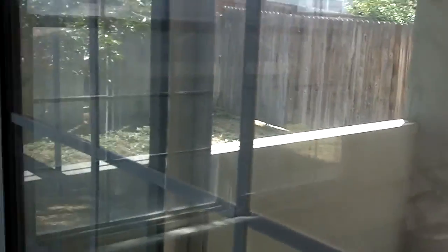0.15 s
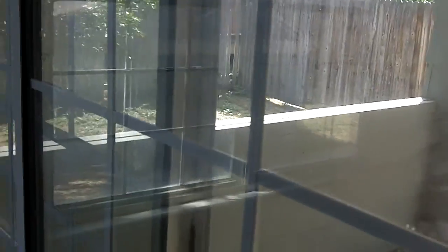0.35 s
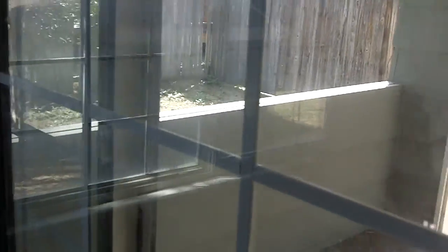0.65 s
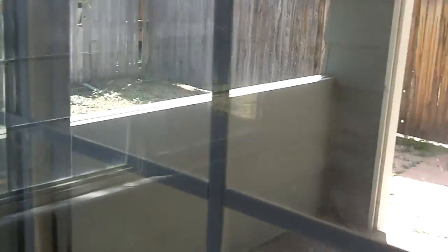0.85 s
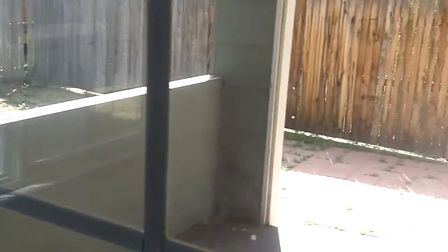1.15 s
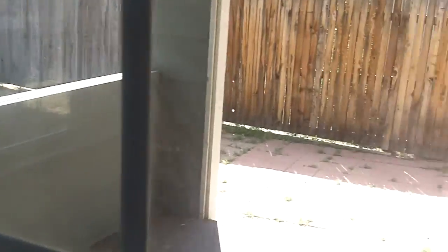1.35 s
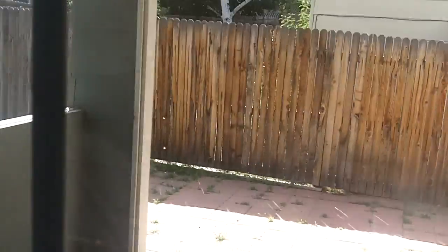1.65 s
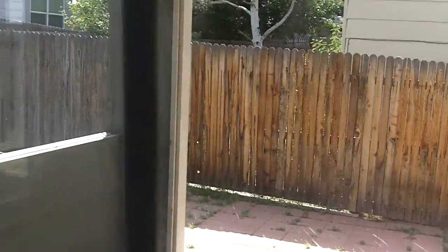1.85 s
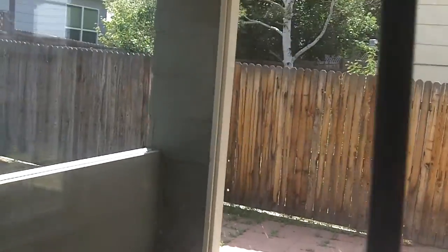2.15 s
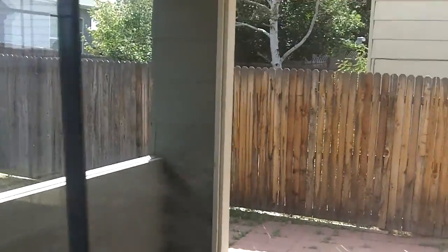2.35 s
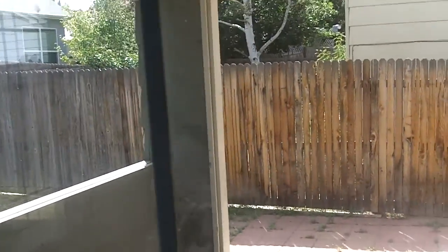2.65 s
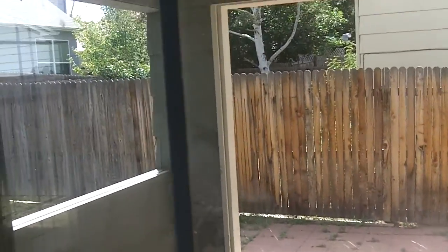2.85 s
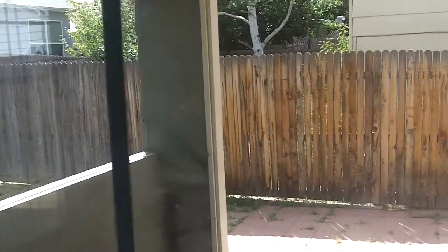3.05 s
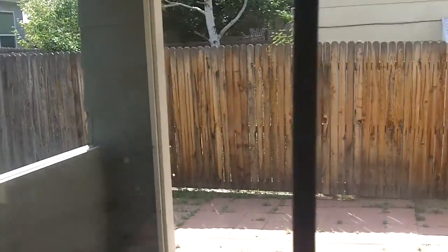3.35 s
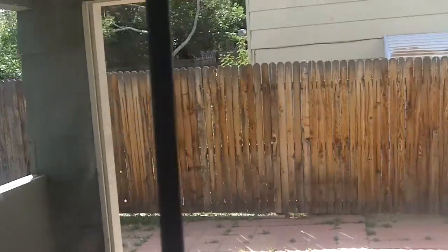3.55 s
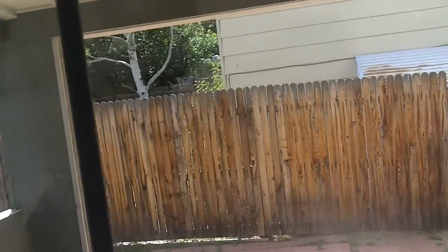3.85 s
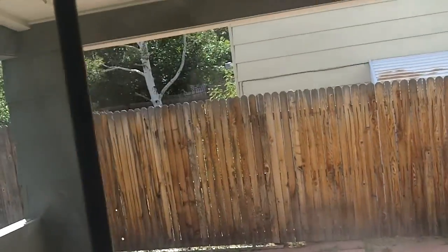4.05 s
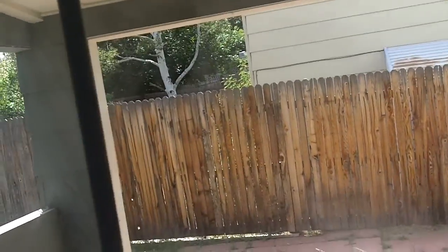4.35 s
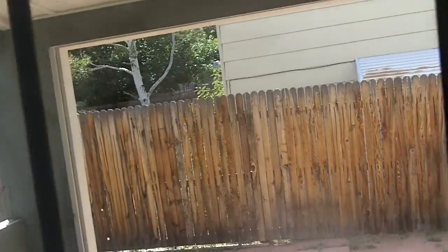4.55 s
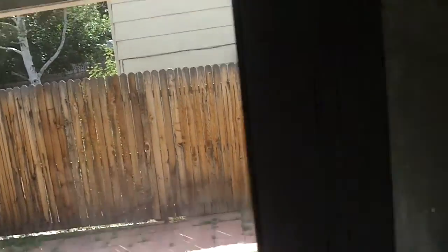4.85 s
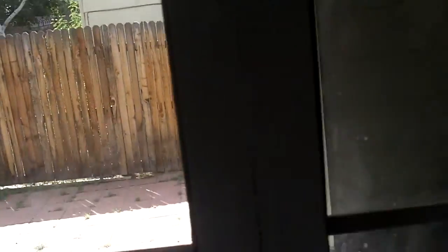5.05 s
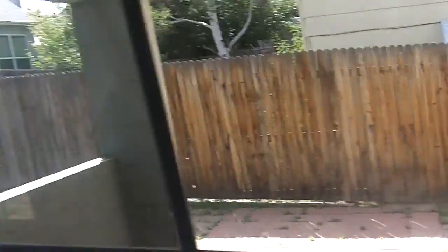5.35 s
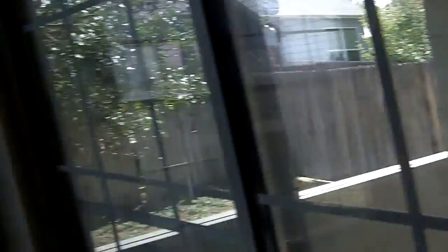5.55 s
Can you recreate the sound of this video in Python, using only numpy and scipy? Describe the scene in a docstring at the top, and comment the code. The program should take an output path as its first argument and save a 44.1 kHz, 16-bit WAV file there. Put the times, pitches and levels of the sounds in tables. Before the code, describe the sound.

Rolling rumble of a heavy glass door swells for a second, ends in a sharp double bang and shudder, followed later by a bright latch click.

```python
"""Glass patio door rolled open

A glass patio door is rolled open in an empty room: uneven bumps make its rollers rumble and its brush seal hiss.
It hits the end stop in a burst of short noisy blows with ringing, bounces and shudders; the big pane wobbles.
Later the latch snaps as a filtered click with a pinging spring. Soft knocks, ticks, scuffs and rattles
come before and after, over shaped noise for the quiet air from the yard. An echo adds the room."""
import sys
import numpy as np
from scipy import signal
from scipy.fft import rfft, irfft, next_fast_len
from scipy.io import wavfile
from scipy.ndimage import uniform_filter1d

SR = 44100
rng = np.random.default_rng(int(sys.argv[2]) if len(sys.argv) > 2 else 0)


def file_out(sig):
    """Save sig as 16-bit WAV at sys.argv[1]."""
    # one column per channel
    cols = np.atleast_2d(sig).T
    # limit, then scale
    lim = np.clip(cols, -1, 1)
    pcm = np.round(lim * 32767).astype(np.int16)
    wavfile.write(sys.argv[1], SR, pcm)


N = 250929
T = np.arange(N) / SR   # time in seconds

# In all tables, t60 is the time to fade by 60 dB, and a level "over 5 ms" spreads a hit's energy over 5 ms.
# Tone of the quiet air from the yard. Each row: frequency in Hz, relative level in dB.
YARD_TONE = [(70, -8.5), (118, -1), (150, -11), (200, -10.5), (270, -18), (600, -22.5), (1200, -22.5),
             (1450, -28), (3200, -33), (6000, -38), (12000, -42), (15000, -53)]
YARD_DB = -58.5
# How long the room echoes. Each row: frequency in Hz, t60 in seconds.
ROOM_FADE = [(100, 1), (400, .7), (1500, 0.49), (4000, .52), (8000, .37), (14000, 0.28)]
# Soft scuffs of hand and feet. Each row: peak time in seconds, half length in seconds, level in dB.
SCUFFS = [(0.073, 0.24, -58.5), (0.392, 0.064, -56.5), (2.64, 0.16, -63), (4.608, 0.047, -64.5),
          (5.01, 0.11, -61.5)]
# Tone of a scuff. Each row: frequency in Hz, relative level in dB.
SCUFF_TONE = [(170, -6), (370, 5), (700, -3), (1000, 1), (1600, -13), (4000, -16.5), (8000, -25.5),
              (13000, -34.5)]
# Soft knocks of hand and feet. Each row: start in seconds, level in dB over 5 ms, dull above Hz, t60 in seconds.
KNOCKS = [(.097, -43, 900, 0.052), (2.583, -35.5, 1900, 0.035), (2.615, -44.5, 330, .12),
          (3.8996, -45, 240, 0.06), (4.539, -49, 420, 0.032), (4.5788, -45.5, 520, 0.029),
          (5.025, -54, 480, .08), (5.308, -57, 1500, .1)]
# Tone of a soft knock. Each row: frequency in Hz, relative level in dB.
KNOCK_TONE = [(50, -7.5), (130, 2), (400, 2), (700, -5.5), (1800, -6), (14000, -24.5)]
# Small bright ticks: grit under the rollers, the door settling, the camera being handled.
# Each row: start in seconds, level in dB over 5 ms, pitch in Hz, filter width as a share of the pitch,
# t60 in seconds.
TICKS = [(0.0728, -54, 1950, 1.1, .08), (0.0952, -46.5, 1290, 0.86, 0.055), (1.333, -51, 6000, .9, .012),
         (1.373, -50, 7940, 0.46, .012), (1.752, -55.5, 7000, 0.54, .025), (1.911, -61, 7000, 0.6, .015),
         (1.963, -62, 7740, .3, .015), (2.572, -50, 3300, .8, 0.01), (2.5855, -43, 2400, 1.17, .02),
         (2.992, -56.5, 2100, .6, 0.02), (3.009, -58, 3300, .7, .05), (3.5772, -55.5, 2300, .8, 0.025),
         (4.0777, -38.5, 3700, 0.73, 0.012), (4.5205, -56.5, 8000, .35, 0.022),
         (4.5212, -58, 2980, 0.53, 0.019), (4.578, -51, 3120, .2, 0.0095), (4.579, -52, 850, 0.26, .02),
         (4.7278, -57, 4700, 0.78, .0051), (5.145, -55, 8500, 1, 0.14)]
# Loose fittings rattle. Each row: peak time in seconds, half length in seconds, level in dB.
RATTLES = [(3.04, .06, -73), (3.59, .11, -72.5)]
RATTLE_HZ, RATTLE_WIDTH_HZ = 2600, 1900
# The latch snap (level over 5 ms) and its spring (peak level).
LATCH_S, LATCH_DB, SPRING_HZ, SPRING_DB = 4.0663, -33.5, 7060, -5
# Tone of the latch housing. Each row: frequency in Hz, relative level in dB.
LATCH_TONE = [(90, 3.5), (240, 3), (480, -9), (720, 2.5), (1200, -1), (2100, 3.5), (3200, 2), (4000, 5.5),
              (6000, -1), (8000, -2.5), (10000, -15), (13000, -21)]
# The wobble of the big pane.
PANE_HZ, PANE_T60_S, PANE_DB = 12, 3.4, -17.5
# Stirred air: level at rest, level added by steady top speed, and how slowly it follows the door.
STILL_AIR_DB, MOVING_AIR_DB, AIR_LAG_S = -51, -29, 0.39
# Short scrapes as the door rocks. Each row: peak time in seconds, level in dB.
SCRAPES = [(1.003, -47.5), (1.122, -48.5), (1.843, -52), (2.011, -56), (2.135, -58.5), (2.244, -64)]
# The frame chafes in its channel; the level is for top speed.
CHAFE_HZ, CHAFE_WIDTH_HZ, CHAFE_DB = 4200, 1400, -57
# The shudder builds up after the rebound and dies away.
SHUDDER_S, SHUDDER_RISE_S, SHUDDER_DB, SHUDDER_FALL_DB_PER_S = 1.674, .12, -45, 24
# Tone of the loose door rattling. Each row: frequency in Hz, relative level in dB.
SHUDDER_TONE = [(60, -0.5), (220, 4), (400, 1), (600, -5.5), (1600, -14.5), (3000, -21), (4200, -18.5),
                (6500, -36.5), (12000, -52)]
# Blows of the frame on the end stop. Each row: start in seconds, level in dB over 5 ms, dull above Hz,
# crunch t60 in seconds, then the ring of the struck part: level in dB, pitch in Hz, t60 in seconds.
BLOWS = [(1.5762, -31, 3500, 0.015, -9.5, 240, .023), (1.579, -18, 14000, 0.0071, -20, 280, .025),
         (1.5802, -12, 9500, 0.011, -26, 2620, .055), (1.6112, -25, 1500, 0.035, -19.5, 710, .025),
         (1.6200, -14, 2300, 0.015, -14, 1080, .03), (1.6274, -28, 2500, 0.03, -25, 3400, .02)]
# Tone of the blows. Each row: frequency in Hz, relative level in dB.
BLOW_TONE = [(100, -9.5), (300, 3), (520, -7), (700, -4), (1200, 2.5), (1600, -6.5), (2100, -1.5),
             (2900, -5.5), (4500, -2.5), (6500, -11), (9000, -11), (15000, -28)]
# Pitches at which the struck door rings. Each row: pitch in Hz, relative level in dB, t60 in seconds.
DOOR_MODES = [(114.7, -32, .5), (168.6, -39, 0.74), (228, -40, .7), (600, -39, .3), (857, -42, 0.35),
              (1066, -45, 0.25), (1190, -42, .2)]
# A flat spot on a roller jolts it once each turn. Each row: start in seconds, thud level in dB over 5 ms, click
# level in dB over 5 ms, click pitch in Hz.
JOLTS = [(.587, -33, -43, 800), (.683, -30.5, -45, 700), (.785, -27, -40, 900), (.803, -30, -43, 1000),
         (.903, -25, -41, 1700), (1.051, -28, -42, 1400), (1.116, -26, -42, 2500),
         (1.408, -31.5, -43, 1700), (1.548, -34, -43, 2300)]
# The door's speed, easing before the stop. Each row: time in seconds, share of top speed.
SPEED_CURVE = [(.32, 0.017), (.34, 0.046), (.42, .08), (.47, 0.33), (.62, 0.48), (.8, 0.91), (1.08, 1),
               (1.22, 0.83), (1.33, 0.68), (1.56, 0.72), (1.6, 0)]
# The rollers drive the hollow frame. Each row: pitch in Hz, width in Hz, relative level in dB.
FRAME_MODES = [(182, 45, -1), (235, 55, 0), (285, 45, -2)]
# Tone of the wheels on the track. Each row: frequency in Hz, relative level in dB.
RUMBLE_TONE = [(50, -12), (100, -3), (170, -0.5), (300, 1.5), (380, -7.5), (520, -9.5), (700, -18.5),
               (2000, -54.5)]
# Tone of the grit under the wheels. Each row: frequency in Hz, relative level in dB.
GRIT_TONE = [(250, -10.5), (600, -2), (830, 7.5), (1150, 1), (2100, -9.5), (3200, -17.5), (9000, -42)]
# Tone of the brush seal rubbing along the frame. Each row: frequency in Hz, relative level in dB.
SEAL_TONE = [(1000, -14), (2100, -4.5), (3100, -2.5), (4400, 2), (6300, -5), (9000, -5.5), (11000, -17.5),
             (14000, -27)]
# Each rolling sound: its base level at top speed, and the power of the speed that it grows with.
RUMBLE_DB, RUMBLE_POWER = -28.5, 1.214
GRIT_DB, GRIT_POWER = -42.5, 1.6
SEAL_DB, SEAL_POWER = -55, 0.42
# The frame booms more as it comes up to the microphone.
FRAME_FAR_DB, FRAME_FAR_S, FRAME_NEAR_S = -9, .7, 1.05
# The wheels drone at a pitch that rises with speed, spread by noise to either side.
DRONE_REST_HZ, DRONE_RISE_HZ, DRONE_SPREAD_HZ, DRONE_DB = 140, 78, 16, -3.5
# The seal breaks free before the wheels get going.
SEAL_START_S, SEAL_RISE_S = .32, .085
CUTOFF_HZ = 15300   # top of the finished sound


def amp(db):
    """Turn decibels into a multiplier."""
    return 10 ** (np.asarray(db) / 20)


def rms_one(x):
    """Scale to an average (rms) strength of 1."""
    return x / np.sqrt(np.mean(x ** 2) + 1e-20)


def hit_one(x):
    """Scale a short sound so that its energy, spread over 5 ms, has an rms of 1."""
    return x * np.sqrt(.005 * SR / np.sum(x ** 2))


def at_hz(points, hz):
    """Read a table between its rows, on a log-frequency axis."""
    f, value = np.transpose(points)
    return np.interp(np.log(np.maximum(hz, 1)), np.log(f), value)


def colour(x, spectrum):
    """Give a sound the tone in a table, falling away beyond both ends, with a causal (minimum-phase) filter."""
    size = next_fast_len(len(x) + SR // 4, real=True) * 2
    hz = np.maximum(np.arange(size // 2 + 1) * SR / size, 1)
    skirts = np.clip(np.minimum(hz / spectrum[0][0], spectrum[-1][0] / hz), .05, 1) ** 2
    cepstrum = irfft(np.log(amp(at_hz(spectrum, hz)) * skirts))[:size // 2]
    cepstrum[1:] *= 2   # folding the cepstrum keeps the filter from sounding early
    response = np.exp(rfft(cepstrum, size))
    return irfft(rfft(x, size) * response)[:len(x)]


def cut(x, hz, kind="low", order=1):
    """Remove frequencies with a Butterworth filter."""
    sos = signal.butter(order, np.clip(hz, 10, .45 * SR), kind, fs=SR, output="sos")
    return signal.sosfilt(sos, x)


def resonate(x, hz, width_hz):
    """Let a sound excite one two-pole resonance, with a gain of 1 on top."""
    r = np.exp(-np.pi * width_hz / SR)
    feedback = [1, -2 * r * np.cos(2 * np.pi * hz / SR), r * r]
    return signal.lfilter(np.array([1, 0, -1]) * (1 - r * r) / 2, feedback, x)


def resonate_twice(x, hz, width_hz):
    """Pass a sound through the same resonance twice, for steeper sides."""
    return resonate(resonate(x, hz, width_hz), hz, width_hz)


def dying(t60, size=SR // 2):
    """Fade exponentially from 1."""
    return np.exp(-np.log(1000) * np.minimum(T[:size] / t60, 5))


def ring(hz, t60, size=SR // 2):
    """A struck part rings as a sine wave that dies away."""
    return np.sin(2 * np.pi * hz * T[:size]) * dying(t60, size)


def even(x):
    """Level out the broad peaks and dips of a random burst, keeping its fine grain; energy 1."""
    spectrum = rfft(x, 2 * len(x))
    power = uniform_filter1d(np.abs(spectrum) ** 2, size=300)
    flat = irfft(spectrum / np.sqrt(power))[:len(x)]
    return flat / np.linalg.norm(flat)


def crunch(t60, sharp):
    """One contact: a first click, as strong as sharp says, and a dying spray of tiny ones."""
    spray = rng.standard_normal(SR // 2) * dying(t60)
    spray[0] = sharp * np.linalg.norm(spray)
    return even(spray)


def add(track, s, sound):
    """Mix a sound in at time s."""
    i = round(s * SR)
    track[i:i + len(sound)] += sound[:N - i]


def bumps(per_s, spread_db):
    """Random impacts of uneven size and either sign."""
    sizes = amp(spread_db * np.minimum(rng.exponential(1, N), 4)) * rng.choice([-1, 1], N)
    return rms_one(sizes * (rng.random(N) < per_s / SR))


def flutter(rate_hz, depth_db):
    """A gain that wavers at random, up to twice the depth either way."""
    wander = rms_one(cut(rng.standard_normal(N), rate_hz, order=2))
    return amp(abs(depth_db) * np.clip(wander, -2, 2))


def swell(s, half_s):
    """A smooth bell-shaped rise and fall around time s."""
    return np.exp(-((T - s) / half_s) ** 2)


def speed():
    """The door's speed as a share of its top speed; the end values hold outside the table."""
    return np.maximum(np.interp(T, *np.transpose(SPEED_CURVE)), 1e-9)


def tick(hz, width_share, t60, top_hz=11000):
    """A bright, heavily damped contact: a crunch through a broad resonance."""
    width_hz = hz * np.clip(width_share, .05, 1.2)
    bright = resonate_twice(crunch(t60, sharp=.3), hz, width_hz)
    return hit_one(cut(bright, top_hz, order=3))


def knock(dull_hz, t60):
    """A soft, dull contact: a crunch with its treble removed."""
    return hit_one(cut(colour(crunch(t60, sharp=.3), KNOCK_TONE), dull_hz, order=2))


def yard_air():
    """The quiet air from the yard is steady noise with a tone of its own."""
    return amp(YARD_DB) * rms_one(colour(rng.standard_normal(N), YARD_TONE))


def room(x, early_db=-2, early_t60=0.073, gap_s=0.0043, wall_hz=9500):
    """Close reflections off glass and wall, then a tail that fades at its own pace in each band."""
    edges = np.geomspace(50, 16000, 13)
    tail = 0
    for lo, hi in zip(edges, edges[1:]):
        band = cut(rng.standard_normal(SR), [lo, hi], "band", order=2)
        tail = tail + band * dying(at_hz(ROOM_FADE, np.sqrt(lo * hi)), size=SR)
    early = even(rng.standard_normal(SR) * dying(early_t60, size=SR))
    response = tail / np.linalg.norm(tail) + amp(early_db) * early
    response = response * (T[:SR] > gap_s)   # no echo returns before the gap is over
    return signal.fftconvolve(x, cut(response, wall_hz))[:N]


def small_sounds():
    """Hand and feet make dull knocks and grainy scuffs of many tiny bumps."""
    rubbing = rms_one(colour(bumps(per_s=4000, spread_db=6.0), SCUFF_TONE))
    out = rubbing * sum(amp(db) * swell(s, half_s) for s, half_s, db in SCUFFS)
    for s, db, dull_hz, t60 in KNOCKS:
        add(out, s, amp(db) * knock(dull_hz, t60))
    return out


def small_ticks():
    """Small bright ticks with little echo, each a damped crunch at its own pitch."""
    out = np.zeros(N)
    for s, db, hz, width_share, t60 in TICKS:
        add(out, s, amp(db) * tick(hz, width_share, t60))
    return out


def rattles():
    """Loose fittings give scattered tiny clicks."""
    clicks = resonate_twice(bumps(per_s=80, spread_db=2.5), RATTLE_HZ, RATTLE_WIDTH_HZ)
    return rms_one(clicks) * sum(amp(db) * swell(s, half_s) for s, half_s, db in RATTLES)


def latch():
    """The catch snaps over in one clean click, toned by its housing."""
    out = np.zeros(N)
    click = colour(signal.unit_impulse(SR // 4), LATCH_TONE)
    add(out, LATCH_S, amp(LATCH_DB) * hit_one(click))
    return out


def spring(width_hz=2300, clatter_s=4.0672, clatter_db=-28, clatter_t60=0.043, clatter_hz=6000):
    """The latch spring pings for a few cycles and the housing clatters, close to the microphone."""
    out = np.zeros(N)
    ping = resonate_twice(signal.unit_impulse(SR // 10), SPRING_HZ, width_hz)
    add(out, LATCH_S, amp(SPRING_DB) * ping / np.abs(ping).max())
    clatter = cut(colour(crunch(clatter_t60, sharp=0.26), LATCH_TONE), clatter_hz)
    add(out, clatter_s, amp(clatter_db) * hit_one(clatter))
    return out


def pane(draught_hz=34, tug_s=0.14, tug_half_s=0.13, tug_db=-39):
    """The big pane flexes at the first tug, pushes air as it moves and wobbles slowly after the stop."""
    air = cut(cut(rng.standard_normal(N), draught_hz, order=3), 18, "high", order=2)
    keep = np.exp(-1 / (AIR_LAG_S * SR))
    stirred = signal.lfilter([1 - keep], [1, -keep], speed())   # follows the speed with a lag
    level = amp(STILL_AIR_DB) + amp(MOVING_AIR_DB) * stirred + amp(tug_db) * swell(tug_s, tug_half_s)
    out = level * rms_one(air)
    add(out, 1.69, amp(PANE_DB) * ring(PANE_HZ, PANE_T60_S, size=3 * SR))
    return out


def chafing(half_s=.013):
    """The frame chafes in its channel: a grainy rub that grows with speed, and short scrapes as the door rocks."""
    grains = resonate_twice(bumps(per_s=2500, spread_db=3.5), CHAFE_HZ, CHAFE_WIDTH_HZ)
    rub = amp(CHAFE_DB) * speed() ** 2 * flutter(rate_hz=25, depth_db=3.0)
    scrapes = sum(amp(db) * swell(s, half_s) for s, db in SCRAPES)
    return rms_one(grains) * (rub + scrapes)


def shudder(boom_s=1.630, boom_hz=92, boom_t60=.2, boom_db=-17):
    """The rebound booms through the wall; the loose door goes on rattling on its rollers."""
    age = (T - SHUDDER_S).clip(0)
    fall = amp(SHUDDER_DB - SHUDDER_FALL_DB_PER_S * (age - SHUDDER_RISE_S))
    level = np.minimum(age / SHUDDER_RISE_S, 1) * fall
    shaking = rms_one(colour(bumps(per_s=1500, spread_db=1), SHUDDER_TONE))
    out = level * shaking * flutter(rate_hz=30, depth_db=1.5)
    add(out, boom_s, amp(boom_db) * ring(boom_hz, boom_t60))
    return out


def end_stop(rattle_db=-12, rattle_t60=0.14, modes_db=-3):
    """Each blow cracks, rattles the frame, thumps the struck part and sets the door's modes ringing."""
    out = np.zeros(N)
    hardest = max(row[1] for row in BLOWS)
    for s, db, dull_hz, t60, thump_db, thump_hz, thump_t60 in BLOWS:
        contact = crunch(t60, sharp=0.45) + amp(rattle_db) * crunch(rattle_t60, sharp=0)
        add(out, s, amp(db) * hit_one(cut(colour(contact, BLOW_TONE), dull_hz)))
        add(out, s, amp(thump_db) * ring(thump_hz, thump_t60))
        # each blow strikes the modes slightly differently
        modes = sum(amp(level + rng.normal(0, 1)) * ring(hz, mode_t60, size=SR)
                    for hz, level, mode_t60 in DOOR_MODES)
        add(out, s, amp(db - hardest + modes_db) * cut(modes, dull_hz, order=2))
    return out


def roller_jolts(thud_hz=580, thud_t60=.085, click_width=.9, click_t60=.09):
    """Each jolt of the roller's flat spot thuds in the frame and clicks on the rail."""
    out = np.zeros(N)
    for s, thud_db, click_db, click_hz in JOLTS:
        thud = amp(thud_db) * knock(thud_hz, thud_t60)
        click = amp(click_db) * tick(click_hz, click_width, click_t60)
        add(out, s, thud + click)
    return out


def drone():
    """The wheels' narrow, unsteady hum, gliding with the door's speed."""
    phase = 2 * np.pi * np.cumsum(DRONE_REST_HZ + DRONE_RISE_HZ * speed()) / SR
    a, b = cut(rng.standard_normal((2, N)), DRONE_SPREAD_HZ, order=3)
    return rms_one(a * np.cos(phase) + b * np.sin(phase))


def rolling(frame_top_hz=380, frame_db=-2.5, track_db=-2, sand_db=-9):
    """Rollers jolt over rough track and shake the frame; grit crackles and the seal brushes over sand grains."""
    rumble = amp(RUMBLE_DB) * speed() ** RUMBLE_POWER
    grit = amp(GRIT_DB) * speed() ** GRIT_POWER
    seal = amp(SEAL_DB) * speed() ** SEAL_POWER

    # soft wheels pass no treble to the frame
    jolts = cut(bumps(per_s=900, spread_db=3.0), frame_top_hz, order=3)
    frame = rms_one(sum(amp(db) * resonate(jolts, hz, width_hz) * flutter(rate_hz=14, depth_db=2.5)
                        for hz, width_hz, db in FRAME_MODES))
    track = rms_one(colour(bumps(per_s=1200, spread_db=3.0), RUMBLE_TONE))
    nearness = amp(np.interp(T, [FRAME_FAR_S, FRAME_NEAR_S], [FRAME_FAR_DB, 0]))
    body = nearness * (amp(frame_db) * frame + amp(DRONE_DB) * drone()) + amp(track_db) * track

    crackle = rms_one(colour(bumps(per_s=3000, spread_db=4.0), GRIT_TONE))
    sand = amp(sand_db) * bumps(per_s=60, spread_db=2.5)
    brush = rms_one(colour(bumps(per_s=8100, spread_db=4.5) + sand, SEAL_TONE))
    brush = brush * np.clip((T - SEAL_START_S) / SEAL_RISE_S, 0, 1)
    pressure = flutter(rate_hz=35, depth_db=1.4)   # the door rocks, so the rubbing comes in surges
    return rumble * body + pressure * (grit * crackle + seal * brush)


def scene(roll_wet_db=-10, stop_wet_db=-14.5, latch_wet_db=-1, spring_wet_db=-23, small_wet_db=-6.5,
          tick_wet_db=-15):
    """All sources in the room, each feeding the echo by its wet level; both channels are alike."""
    sources = [(small_sounds(), small_wet_db),
               (small_ticks() + rattles(), tick_wet_db),
               (latch(), latch_wet_db),
               (spring(), spring_wet_db),
               (end_stop(), stop_wet_db),
               (rolling() + roller_jolts() + shudder() + chafing(), roll_wet_db)]
    direct = sum(sound for sound, wet_db in sources)
    echo = room(sum(amp(wet_db) * sound for sound, wet_db in sources))
    mono = direct + echo + pane() + yard_air()   # pane and yard skip the echo
    return np.array([mono, mono])


def record(dry, notch_hz=5480, notch_width_hz=950):
    """The microphone port cuts a treble notch; peaks clip, the top is cut, each channel gets a steady offset."""
    notched = dry - resonate(dry, notch_hz, notch_width_hz)
    clipped = np.clip(notched, -.92, .92)
    top_cut = signal.ellip(10, .1, 80, CUTOFF_HZ, fs=SR, output="sos")
    offset = np.array([[.0024], [-.0176]])
    return signal.sosfilt(top_cut, clipped) + offset


dry = scene()
out = record(dry)
file_out(out)
```